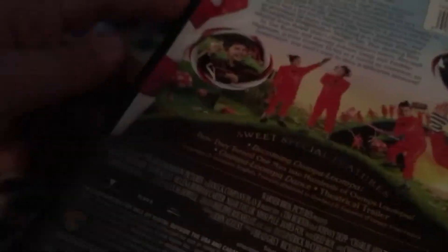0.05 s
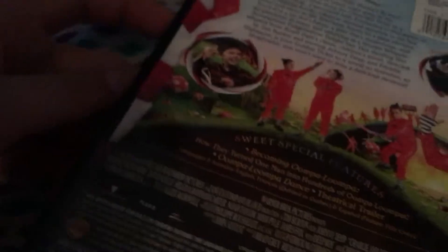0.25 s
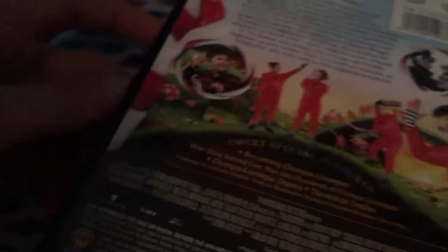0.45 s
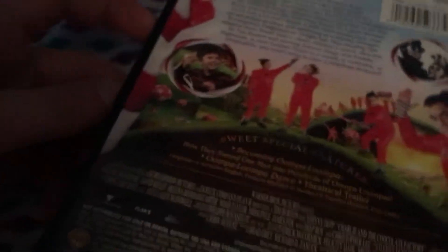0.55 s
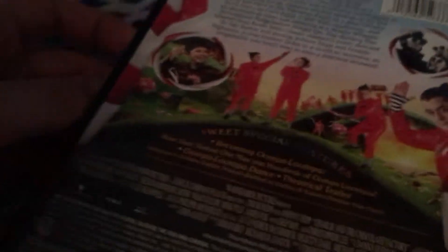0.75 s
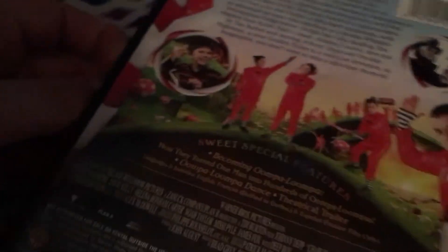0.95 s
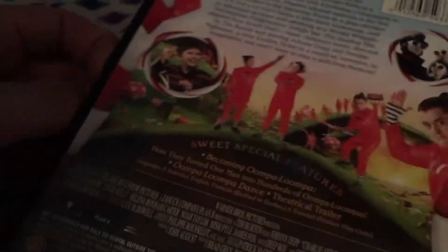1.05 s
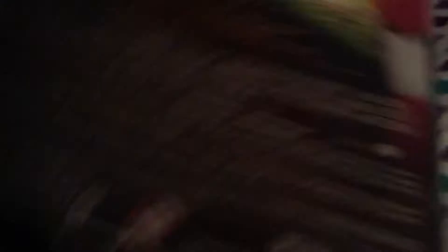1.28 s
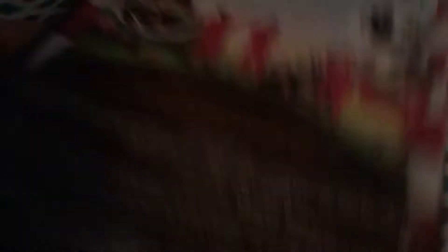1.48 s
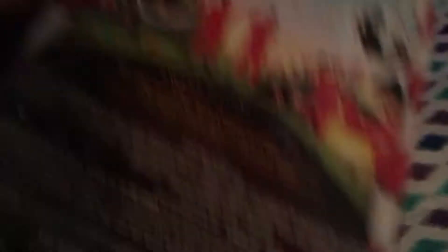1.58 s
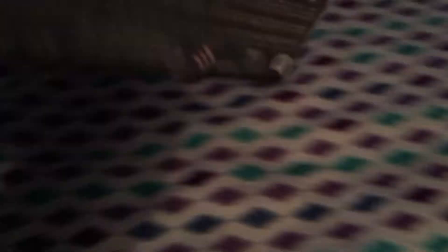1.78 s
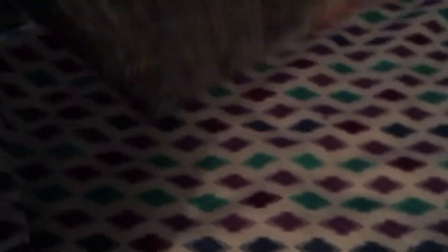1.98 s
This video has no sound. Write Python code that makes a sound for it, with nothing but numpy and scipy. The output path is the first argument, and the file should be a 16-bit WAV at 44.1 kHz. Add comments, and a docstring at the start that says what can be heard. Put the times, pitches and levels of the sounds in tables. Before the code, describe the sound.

A plastic disc case is handled close up in a quiet, furnished room. Soft finger rubs and faint ticks come first, with small clicks near 0.4 and 0.8 s. At 1.2 s it snaps loudly in a rapid run of clacks, rattling away until about 1.5 s. Glossy sliding hisses, a tiny rising squeak near 1.75 s, light clicks and dull hand rumble follow to the end.

```python
"""A small, soft room: a plastic disc case is handled close to the microphone.
Fingers rub its sleeve (coloured friction noise) and the lid snaps shut in a quick run of catches.
Then the case is turned over: it clicks and rattles (noise cracks, ringing shell and panel modes)
while its glossy cover slides through the hand (gliding narrow noise and hiss) and a fingertip squeaks.
Dull rumble from the hands, a faint room tail and still air lie underneath."""
import sys
import numpy as np
from scipy import signal
from scipy.fft import rfft, irfft
from scipy.io import wavfile

SR = 44100
rng = np.random.default_rng(int(sys.argv[2]) if len(sys.argv) > 2 else 0)


def persist_wave(psi):
    """Save psi, clipped to +-1, as 16-bit WAV."""
    counts = np.round(np.clip(psi, -1, 1) * 32767).astype(np.int16)
    wavfile.write(sys.argv[1], SR, np.atleast_2d(counts).T)


N = 89346  # length in samples

SPOT_WIDTH_OCT = 0.14  # half-width of the resonance of a struck or rubbed spot


def undb(db):
    """Decibels to gain."""
    return 10 ** (np.asarray(db) / 20)


def unit(x):
    """Scale to rms 1."""
    return x / np.sqrt(np.mean(x ** 2))


def freqs(size):
    """Frequencies of a spectrum in Hz, kept above zero."""
    return np.maximum(np.arange(size // 2 + 1) * SR / size, 1)


def colour(points, f):
    """Gain at the frequencies f, drawn through (Hz, dB) points on a log-frequency axis."""
    hz, db = np.array(points).T
    return undb(np.interp(np.log(f), np.log(hz), db))


def peak(f, hz, width_oct):
    """Gain of one resonance, down to half at width_oct on either side."""
    return 1 / (1 + (np.log2(f / hz) / width_oct) ** 2)


def shaped(x, gain):
    """Filter with the given gain per frequency, made causal (minimum phase) through its cepstrum."""
    cepstrum = irfft(np.log(gain + 1e-9), len(x))
    cepstrum[1:len(x) // 2] *= 2
    cepstrum[len(x) // 2 + 1:] = 0
    return irfft(rfft(x) * np.exp(rfft(cepstrum)), len(x))


def swell(top_s, rise_s, fall_s):
    """A smooth rise and fall about a moment, as a bell with unequal sides."""
    t = np.arange(N) / SR - top_s
    return np.exp(-(t / np.where(t < 0, rise_s, fall_s)) ** 2)


def knocks(size=8192):
    """Plastic hits plastic: each contact cracks, rings the shell and flexes the panel, with its own spot note."""
    # Knocks of plastic on plastic. Each row: start in seconds, level in dB (crack and shell, as if
    # their energy filled 5 ms), contact brightness in Hz, crack ring in ms (at 3 kHz),
    # panel thump in dB relative to crack and shell, resonance favoured by the spot in Hz.
    contacts = [(0.197, -50, 5850, 5.7, -33, 4970), (0.3906, -33.5, 10600, 1.5, -16, 2250),
                (0.3953, -39, 1300, 0.48, -10, 373), (0.805, -41, 2540, 2.4, -2, 1520),
                (0.816, -43, 900, 2.4, -21, 490), (.848, -49, 12000, 0.87, -7, 4000),
                (0.924, -48.5, 1970, 2.1, -11, 1370), (1.031, -53, 1190, 2.5, 2, 590),
                (1.072, -53.5, 1000, 4, -7, 485), (1.2181, -13, 2400, 4.7, -14.5, 2780),
                (1.2227, -10, 2500, 2.4, -1, 960), (1.2296, -13, 2360, 6.8, -8.5, 1830),
                (1.2405, -9.5, 13600, 1.04, -50, 5350), (1.252, -17, 9100, 4.4, -26, 3950),
                (1.2733, -20.5, 7040, 4, -37, 1170), (1.282, -28, 5070, 2, -8, 2350),
                (1.296, -38, 10000, 3.5, -16, 4700), (1.3083, -25, 6700, 2.4, -8.5, 3640),
                (1.3316, -38.5, 5500, 1.4, -2, 3500), (1.3785, -38, 6900, 1.3, -21, 3270),
                (1.383, -36.5, 3380, 7, -5, 1260), (1.393, -32.5, 2800, 4.7, 10.5, 400),
                (1.3982, -30, 7000, 2.5, 0.5, 5470), (1.407, -26.5, 6570, 0.87, -17, 2620),
                (1.4092, -24, 850, 1.33, -11, 895), (1.4384, -39, 4090, 6.1, -4, 880),
                (1.4614, -31.5, 6270, 1.7, -19, 5200), (1.483, -34, 6260, 4.4, -7.5, 3650),
                (1.5806, -44, 11700, 1.8, -30, 8050), (1.6036, -37.5, 4020, 5.3, -6.5, 1930),
                (1.6292, -41.5, 3700, 2.5, -14.5, 4100), (1.6757, -39.5, 4900, 2.8, -31, 1910),
                (1.696, -41, 2940, 8.1, -7.5, 3400), (1.8341, -30.5, 3200, 1.9, -16, 3650),
                (1.8383, -34.5, 1500, 0.93, -25, 1430), (1.8497, -36.5, 3960, 2.4, -30, 1410),
                (1.866, -40.5, 2060, 15, 2.5, 413), (1.878, -42, 1990, 0.89, -19, 1500),
                (1.887, -31.5, 3740, 0.71, -36, 3730), (1.892, -36.5, 3500, 3.9, -4.5, 2120),
                (1.915, -41, 3000, 2.3, -19, 2130), (1.9627, -28, 3670, 2.3, -6.5, 1280),
                (1.9663, -37.5, 2500, 1.5, -4, 285), (1.9865, -44, 3500, 1.3, -16, 3660),
                (1.993, -43, 3370, 2.7, -6, 3550), (2.014, -46.5, 2030, 6.7, -1, 1330)]
    # Ringing of the shell. Each row: frequency in Hz, level in dB, T60 in seconds.
    shell_modes = [(391, 0.5, 0.041), (641, 3, 0.031), (718, -3.5, 0.038), (908, 2.5, 0.013),
                   (1317, -7.5, 0.021), (1585, 8.5, 0.012), (1950, -6.5, 0.02), (2514, 3, 0.031),
                   (3043, 1.5, 0.049), (3725, 9, 0.026), (4470, 6.5, 0.019), (5670, 2.5, 0.019),
                   (5400, -26, 0.015)]
    # Flexing of the whole panel. Each row: frequency in Hz, level in dB, T60 in seconds.
    panel_modes = [(51, 1.5, 0.056), (92.7, 9.5, 0.045), (133, 4, 0.052), (243.4, -4.5, 0.1),
                   (352, -10, 0.09)]
    # Colour of the crack. Each row: frequency in Hz, gain in dB.
    crack_colour = [(60, -47.5), (170, -2), (300, 1.5), (520, 1), (800, -1), (1400, 5.5), (2300, 0),
                    (4000, -2.5), (6000, -0.5), (8000, -4), (12000, -6), (16000, -15)]
    shell_db, shell_scatter_db, panel_scatter_db = -6, 3.5, 1
    spot_db, contact_ms = 8.5, 0.35

    out, t, f = np.zeros(N + size), np.arange(size) / SR, freqs(size)
    energy_scale = np.sqrt(.005 * SR / size)  # the energy of 5 ms at rms 1
    for s, db, bright_hz, ring_ms, thump_db, spot_hz in contacts:
        body = unit(shaped(crack(t, ring_ms), colour(crack_colour, f)))
        body = body + undb(shell_db) * ring(shell_modes, t, shell_scatter_db)
        body = body * (1 - np.exp(-t * 10 ** 3 / contact_ms))  # soft onset
        # a bright contact tilts the treble up; a dull one rolls off early
        contact = np.hypot(1, f / 3500 * bright_hz / 9000) / np.hypot(1, f / bright_hz)
        contact = contact / np.hypot(1, f / 14000)
        spot = undb(spot_db * peak(f, spot_hz, SPOT_WIDTH_OCT))
        thump = undb(thump_db) * ring(panel_modes, t, panel_scatter_db)
        hit = unit(shaped(body, contact * spot)) + thump
        i = int(s * SR)
        out[i:i + size] += undb(db) * energy_scale * hit
    return out[:N]


def crack(t, ring_ms):
    """Countless short modes as octave bands of noise; they hold as parts buzz together, high ones die first."""
    hold, treble_damping = 1.14, 0.29  # steepness of the die-away; how much sooner high bands die
    tail_db, tail_s = -25, 0.0097  # level and time constant of the after-ring
    f, out = freqs(len(t)), 0
    noise = np.exp(2j * np.pi * rng.random(len(f)))
    for hz in 125 * 2 ** np.arange(8):
        octave = np.cos(np.pi / 2 * np.clip(np.log2(f / hz), -1, 1)) ** 2
        band = irfft(noise * octave, len(t))
        life = ring_ms / 10 ** 3 * (3000 / hz) ** treble_damping
        decay = np.exp(-(t / life) ** hold / 2) + undb(tail_db) * np.exp(-t / tail_s)
        out = out + np.sqrt(hz) * unit(band * decay)  # wider bands carry more energy
    return out


def ring(modes, t, scatter_db):
    """Struck modes as decaying sines, each varied in level and pitch from blow to blow."""
    total = 0
    for k, (hz, db, t60) in enumerate(modes):
        gain = (-1) ** k * undb(db + scatter_db * rng.standard_normal())
        pitch_hz = hz * (1 + 0.012 * rng.standard_normal())
        total = total + gain * np.exp(-np.log(1000) * t / t60) * np.sin(2 * np.pi * pitch_hz * t)
    return unit(total)


def rubs():
    """Fingers stroke the sleeve: friction noise takes the colour of sleeve, stroke and touched spot."""
    # Finger strokes. Each row: peak in seconds, rise in seconds, fall in seconds, level in dB,
    # centre in Hz, half-width in octaves, resonance of the touched spot in Hz.
    strokes = [(.01, 0.074, 0.051, -53.5, 4400, 4.6, 2540), (0.33, 0.0035, 0.012, -55.5, 2980, 1.4, 2320),
               (0.376, 0.02, 0.01, -45, 3420, 1.1, 5200), (0.586, 0.0027, 0.021, -48, 2280, 1.6, 1300),
               (0.607, 0.0098, 0.0087, -44.5, 2840, 3.9, 3930), (0.667, 0.084, 0.025, -56, 2570, 3.3, 1250),
               (0.776, 0.036, 0.042, -51.5, 2000, 2.9, 1170), (0.802, 0.02, 0.0093, -39, 2980, 1.7, 1700),
               (0.824, 0.022, 0.032, -52, 2800, 2.2, 3140), (0.988, 0.087, 0.058, -55, 1110, 2.55, 300),
               (1.35, 0.023, 0.1, -52.5, 1285, 2.6, 900), (1.499, 0.019, 0.13, -53, 1000, 3.1, 965),
               (1.71, 0.063, 0.1, -54.5, 1840, 8.5, 2070), (1.772, 0.027, 0.031, -50, 1880, 2.5, 1570),
               (1.911, 0.024, 0.029, -47, 1800, 2, 2170)]
    # Colour of the sleeve. Each row: frequency in Hz, gain in dB.
    sleeve_colour = [(100, -37), (350, 7.5), (700, 4.5), (1300, 8), (2000, 5.5), (3200, 2.5), (4500, 4),
                     (5400, 0.5), (6500, -6.5), (9300, 3.5), (10500, -7.5), (12000, 0), (16000, -25)]
    spot_db = 8
    f, out = freqs(N), 0
    for s, rise, fall, db, hz, width, spot_hz in strokes:
        spot = undb(spot_db * peak(f, spot_hz, SPOT_WIDTH_OCT))
        gain = colour(sleeve_colour, f) * peak(f, hz, width) * spot
        out = out + undb(db) * swell(s, rise, fall) * unit(shaped(friction(), gain))
    return out


def friction():
    """Dense tiny slips of uneven size: white noise whose level jumps at random every 32 samples."""
    grain_db = 3
    slips = grain_db * np.repeat(rng.standard_normal(N // 32 + 1), 32)[:N]
    return rng.standard_normal(N) * undb(slips)


def slides():
    """The glossy cover slips over skin: a whistle of gliding pitch mixed equally with friction hiss."""
    # Slides of the cover. Each row: peak in seconds, rise in seconds, fall in seconds, level in dB,
    # whistle pitch at the peak in Hz, glide in octaves per second.
    passes = [(1.432, 0.016, 0.0096, -46.5, 7850, 10.5), (1.478, 0.0044, 0.03, -45, 6460, -3.5),
              (1.504, .012, 0.033, -46, 6600, 1), (1.531, 0.033, 0.058, -52, 8100, 0.4),
              (1.7, 0.02, 0.023, -49.5, 7340, 3), (1.787, 0.031, .017, -46.5, 7820, 9.5),
              (1.925, 0.023, 0.026, -52.5, 8670, 0)]
    # Colour of the hiss. Each row: frequency in Hz, gain in dB.
    hiss_colour = [(1000, -10), (4500, -13), (6500, -8.5), (9000, -3), (11000, -14.5), (13500, -12),
                   (16000, -21)]
    whistle_width_hz = 440
    t, out = np.arange(N) / SR, 0
    for s, rise, fall, db, hz, glide in passes:
        glide_s = np.clip(t - s, -2 * rise, 2 * fall)  # pitch rests outside the stroke
        tone = whistle(hz * 2 ** (glide * glide_s), whistle_width_hz)
        hiss = unit(shaped(friction(), colour(hiss_colour, freqs(N))))
        out = out + undb(db) * swell(s, rise, fall) * unit(tone + hiss)
    return out


def squeak():
    """A fingertip sticks and slips: a narrow whistle and its octave rise in pitch together."""
    # Path of the squeak. Each row: time in seconds, pitch in Hz, level of the lower tone in dB.
    squeak_path = [(1.692, 1917, -66), (1.713, 2028, -56), (1.739, 2206, -66), (1.751, 2650, -45.5),
                   (1.766, 2990, -52), (1.783, 3580, -74)]
    width_hz, octave_db = 160, -12
    t = np.arange(N) / SR
    s, pitch, db = np.array(squeak_path).T
    hz = np.interp(t, s, pitch)
    tone = whistle(hz, width_hz) + undb(octave_db) * whistle(2 * hz, 2 * width_hz)
    sounding = (t > s[0]) * (t < s[-1])
    return undb(np.interp(t, s, db)) * sounding * tone


def whistle(hz, width_hz):
    """Friction through a narrow, moving resonance: slow noise carried up to the pitch hz."""
    f = np.abs(np.fft.fftfreq(N, 1 / SR))
    slow = np.fft.ifft(np.exp(2j * np.pi * rng.random(N)) / (1 + (f / width_hz) ** 2))
    return unit(np.real(slow * np.exp(2j * np.pi * np.cumsum(hz) / SR)))


def rumble():
    """Dull handling noise as the hands shift: one low-coloured noise, swelling at each move."""
    # Shifts of the hands. Each row: peak in seconds, half length in seconds, level in dB.
    shifts = [(0.323, 0.028, -62.5), (0.58, 0.096, -65), (0.98, 0.059, -57.5), (1.46, 0.27, -52.5),
              (1.777, 0.023, -48), (1.878, 0.051, -46.5), (1.98, 0.037, -49.5)]
    dull_colour = [(20, 6), (60, 15), (130, 5.5), (220, 4.0), (400, 1.0), (1500, -23), (8000, -93)]  # Hz, dB
    noise = unit(shaped(rng.standard_normal(N), colour(dull_colour, freqs(N))))
    return sum(undb(db) * swell(s, length, length) for s, length, db in shifts) * noise


def mirrored(x):
    """The cloth-covered surface below returns a dulled echo, whose comb filtering hollows the sound."""
    delay_ms, echo_db, dull_hz = 3.07, -16.5, 2100
    f = freqs(N)
    echo = undb(echo_db) / np.hypot(1, f / dull_hz)
    comb = 1 + echo * np.exp(-2j * np.pi * f * delay_ms / 10 ** 3)
    return irfft(rfft(x) * comb / np.hypot(1, echo), N)  # average energy is kept


def room(x):
    """A faint, short tail from the furnished room: convolution with dulled, decaying noise."""
    t60_s, tail_db, build_up_s, dull_hz = 0.24, -36, 0.011, 5000
    t = np.arange(N) / SR
    tail = shaped(rng.standard_normal(N), 1 / np.hypot(1, freqs(N) / dull_hz))
    tail = tail * np.exp(-np.log(1000) * t / t60_s) * np.minimum(t / build_up_s, 1) ** 2
    tail = unit(tail) / np.sqrt(N)  # total energy 1
    return x + undb(tail_db) * signal.fftconvolve(x, tail)[:N]


def still_air():
    """Steady background air: coloured noise, strongest in the bass."""
    # Colour of the air. Each row: frequency in Hz, spectral level in dB per Hz (relative).
    air_colour = [(18, -16), (30, -1), (109, -10), (174, -10), (215, -20), (384, -23), (760, -27),
                  (1460, -20.5), (2230, -25), (4650, -30), (5740, -30), (10200, -33.5), (16000, -37)]
    air_db = -62
    return undb(air_db) * unit(shaped(rng.standard_normal(N), colour(air_colour, freqs(N))))


def scene():
    """The case and the hands in the room, over rumble and still air."""
    case = knocks() + rubs() + slides() + squeak()
    return (room(mirrored(case)) + rumble() + still_air())[None]


def record(dry):
    """The recorder cuts the deepest bass, clips the highest peaks and cuts the top."""
    bass_cut = signal.butter(5, 43, "high", fs=SR, output="sos")
    top_cut = signal.ellip(8, .2, 80, 15800, fs=SR, output="sos")
    clipped = np.clip(signal.sosfilt(bass_cut, dry), -1, 1)
    return signal.sosfilt(top_cut, clipped)


dry = scene()
out = record(dry)
persist_wave(out)
```